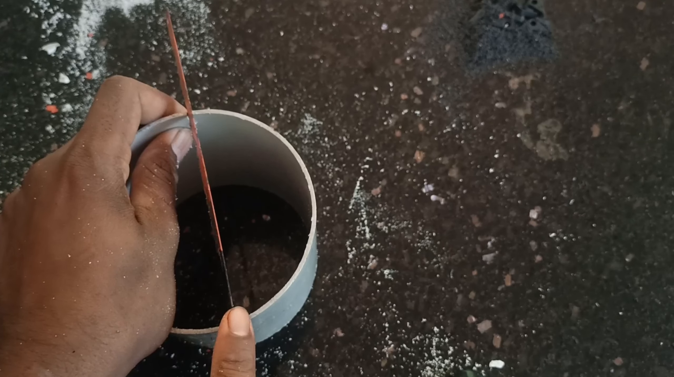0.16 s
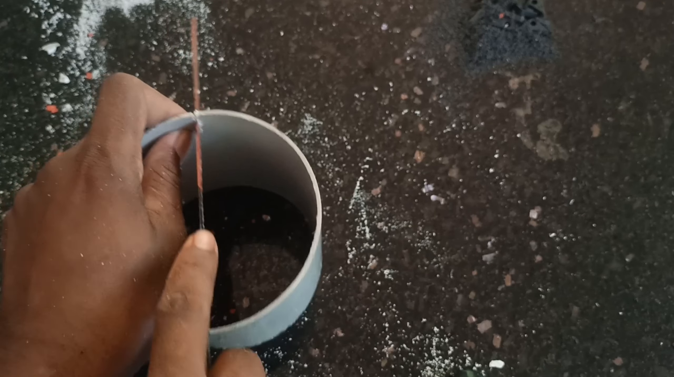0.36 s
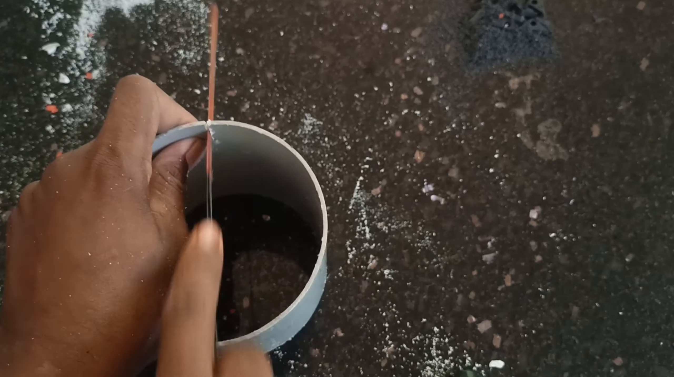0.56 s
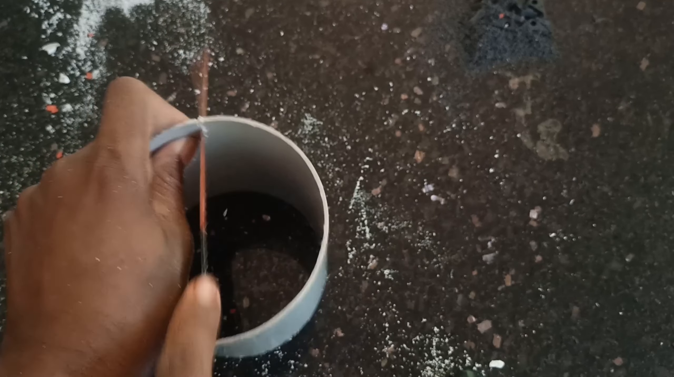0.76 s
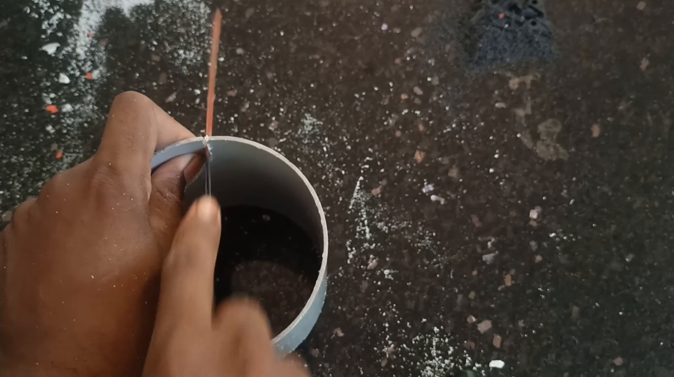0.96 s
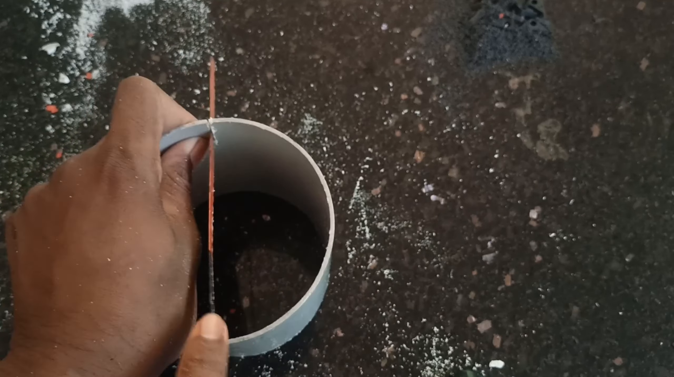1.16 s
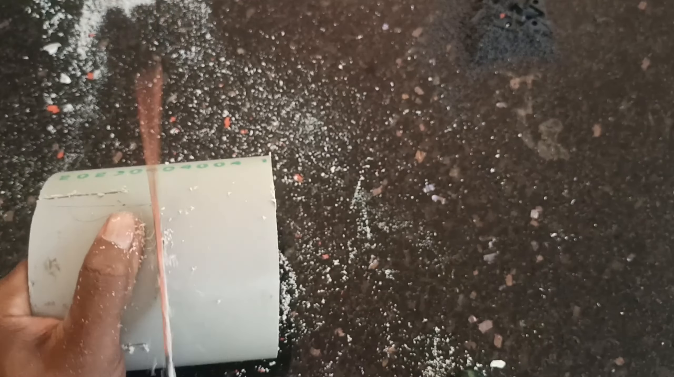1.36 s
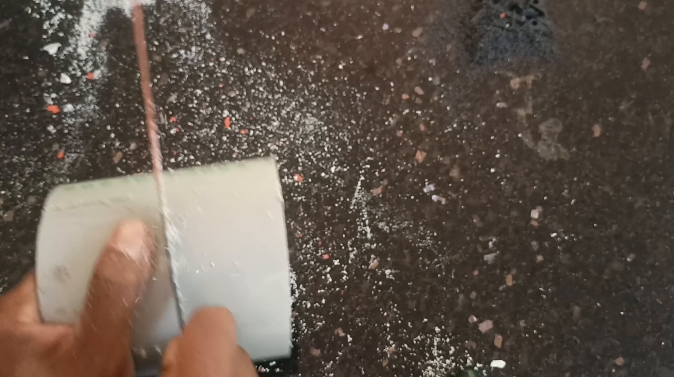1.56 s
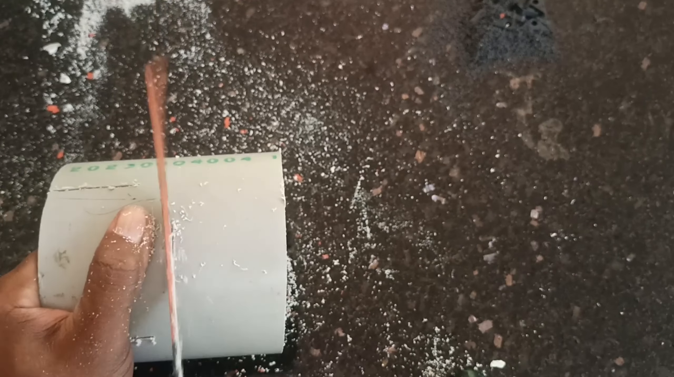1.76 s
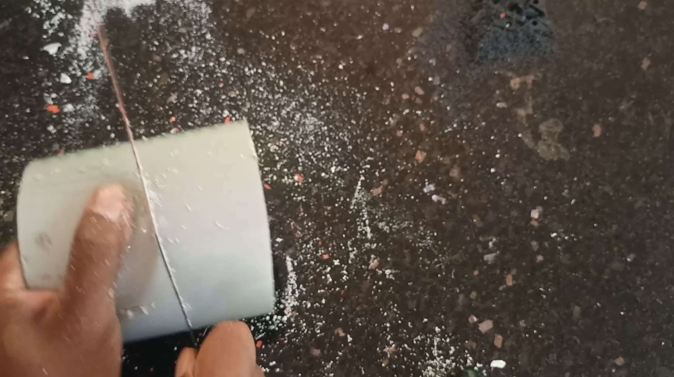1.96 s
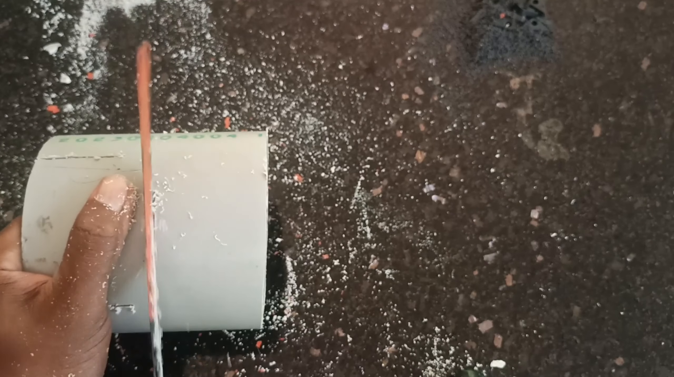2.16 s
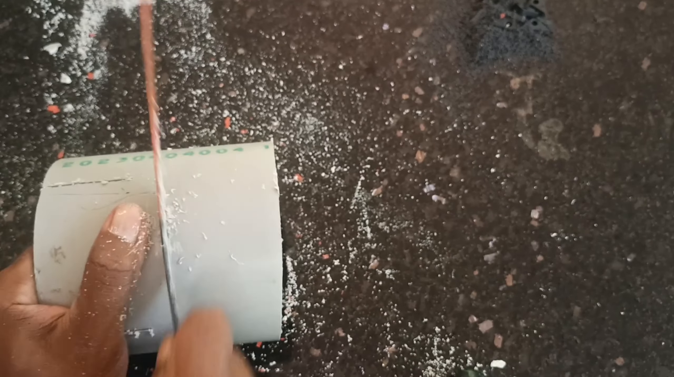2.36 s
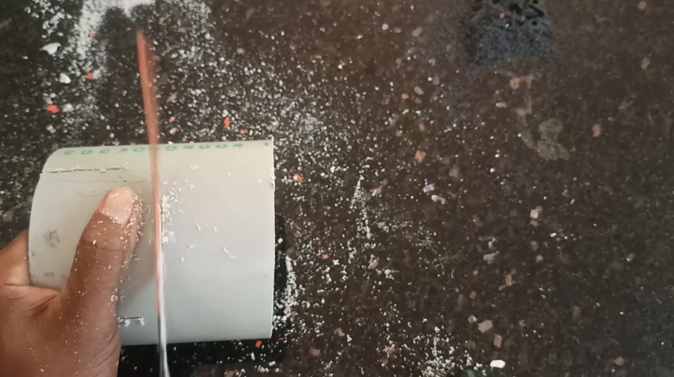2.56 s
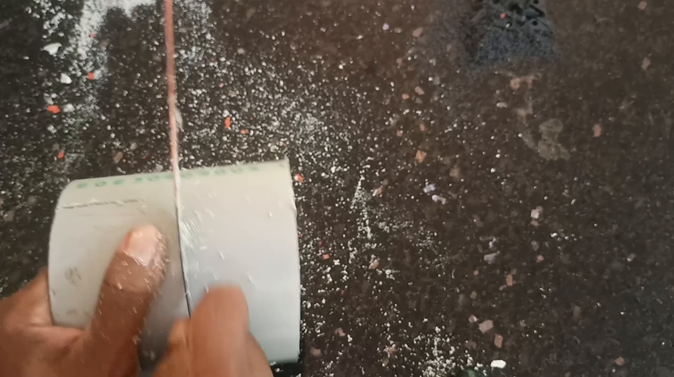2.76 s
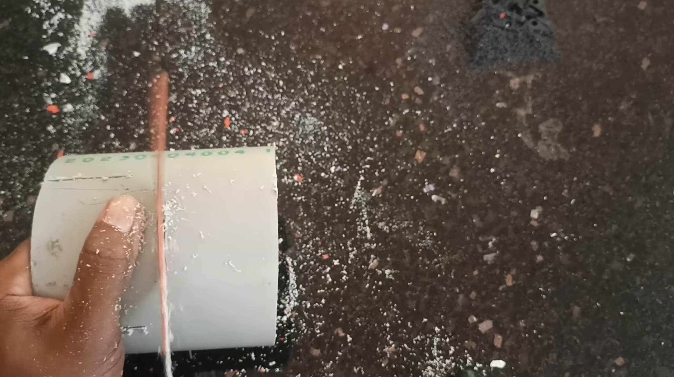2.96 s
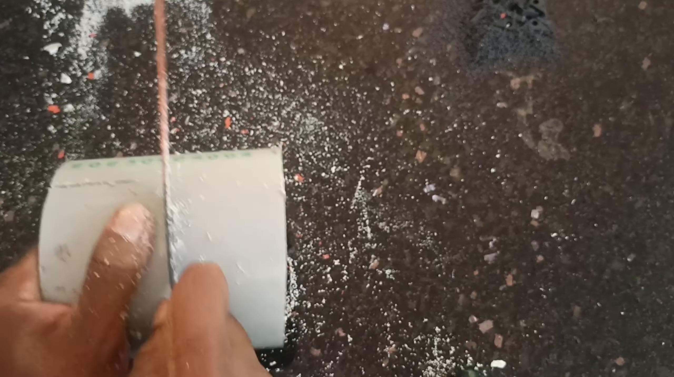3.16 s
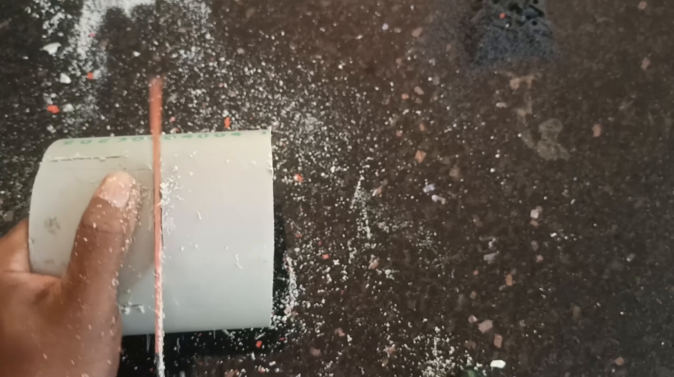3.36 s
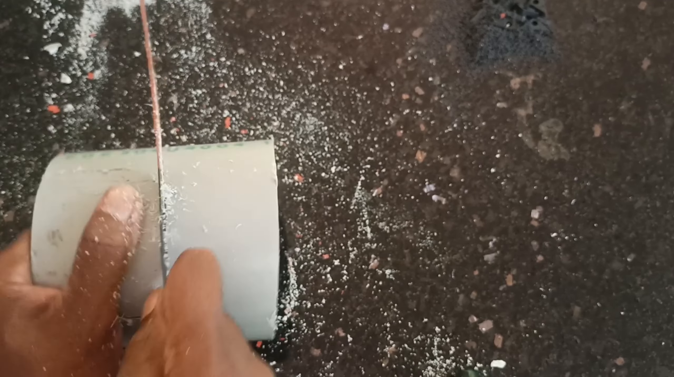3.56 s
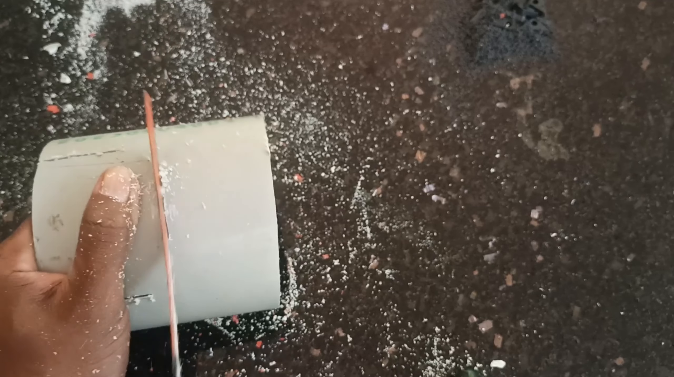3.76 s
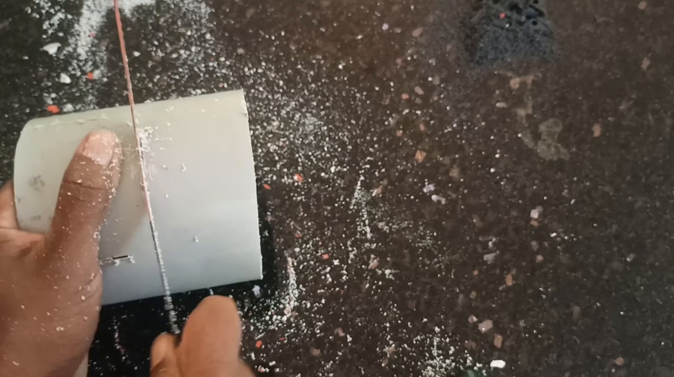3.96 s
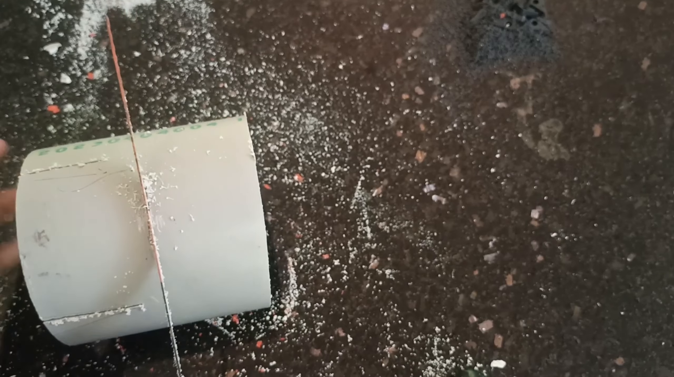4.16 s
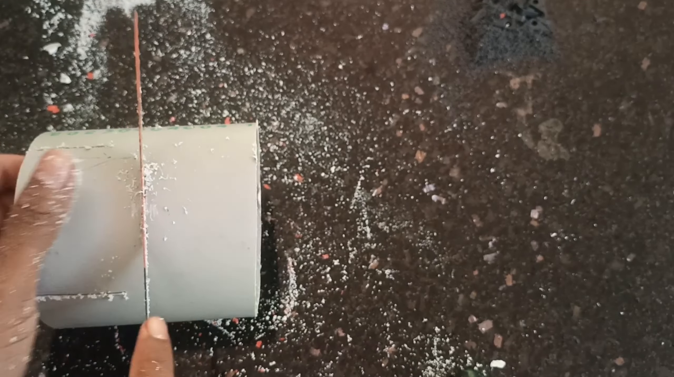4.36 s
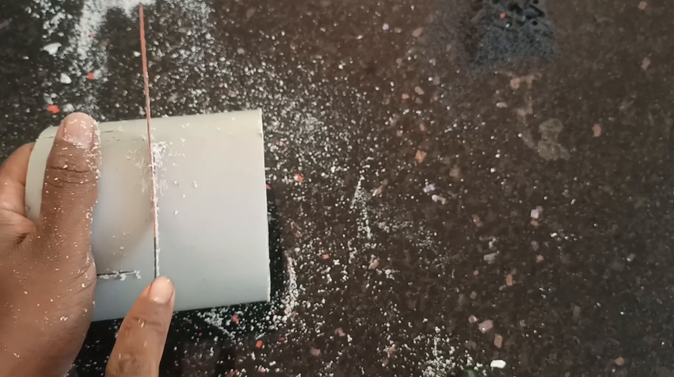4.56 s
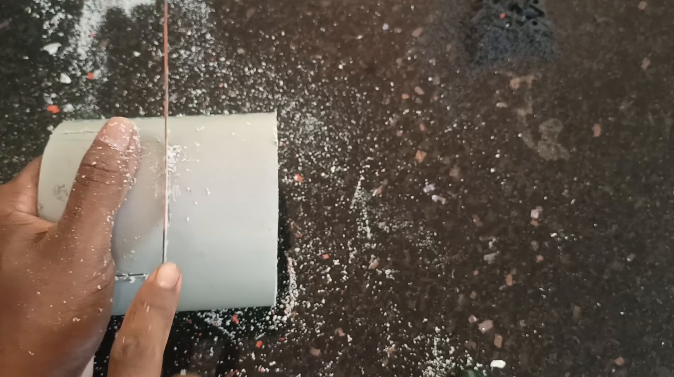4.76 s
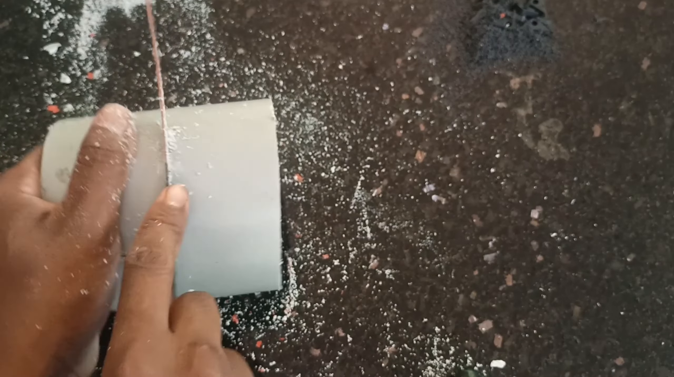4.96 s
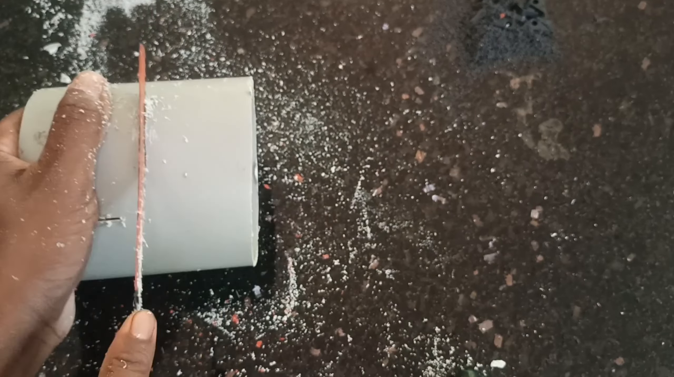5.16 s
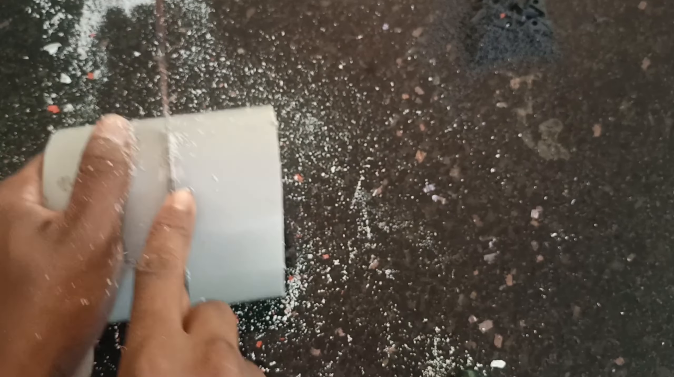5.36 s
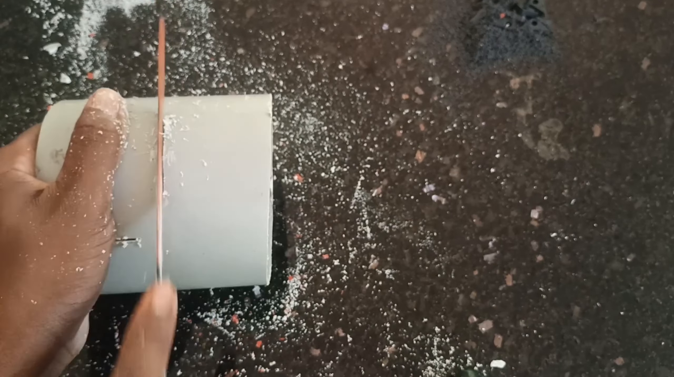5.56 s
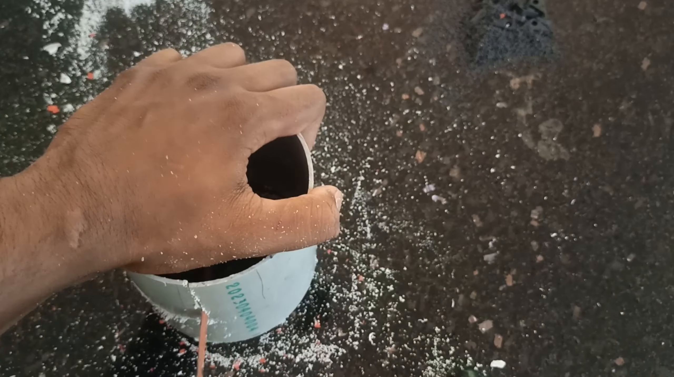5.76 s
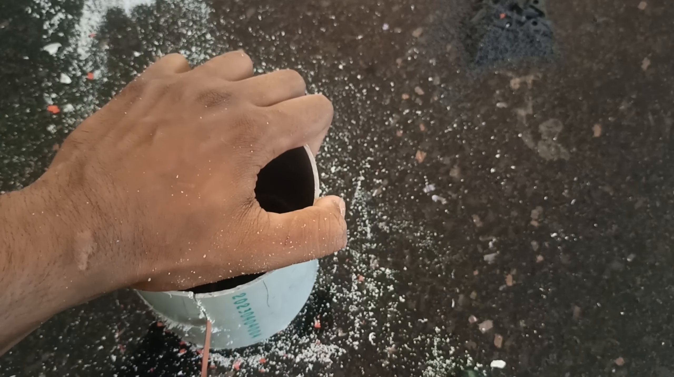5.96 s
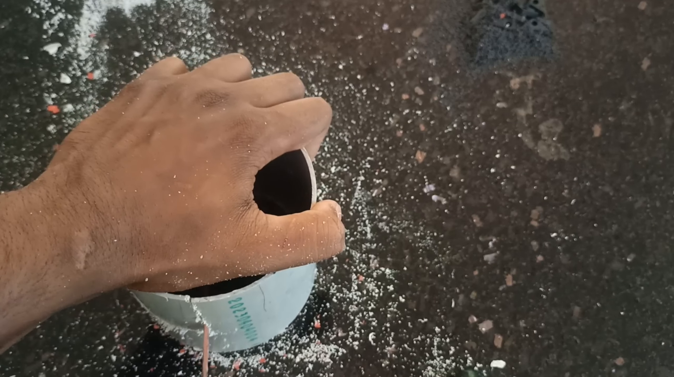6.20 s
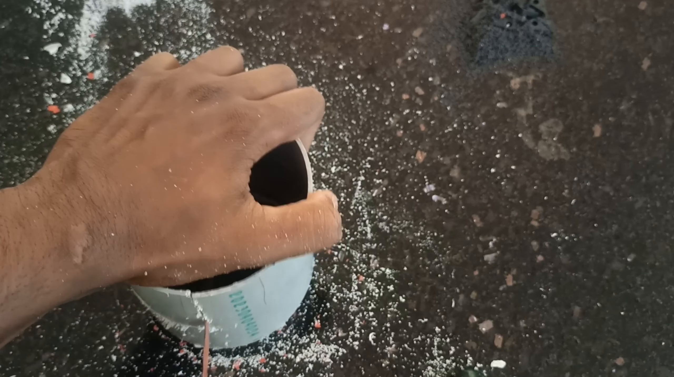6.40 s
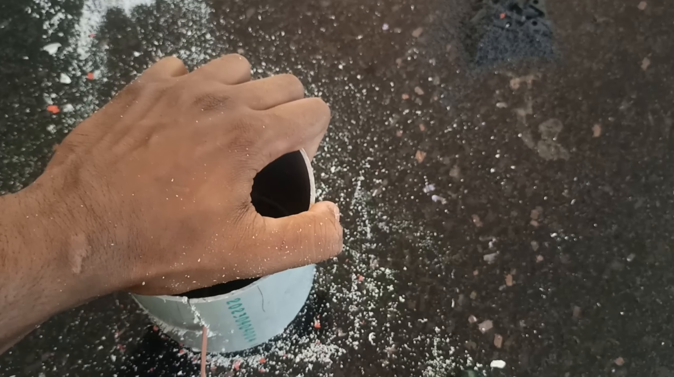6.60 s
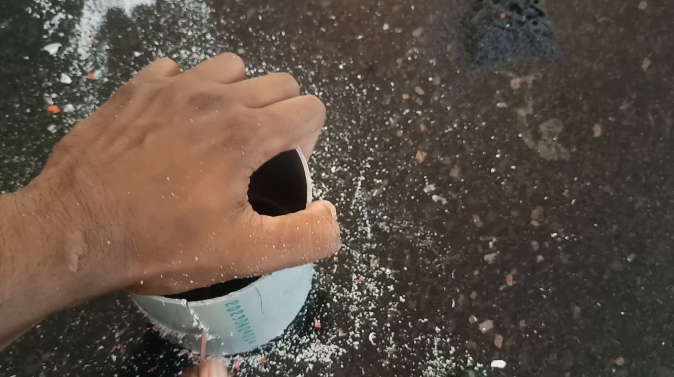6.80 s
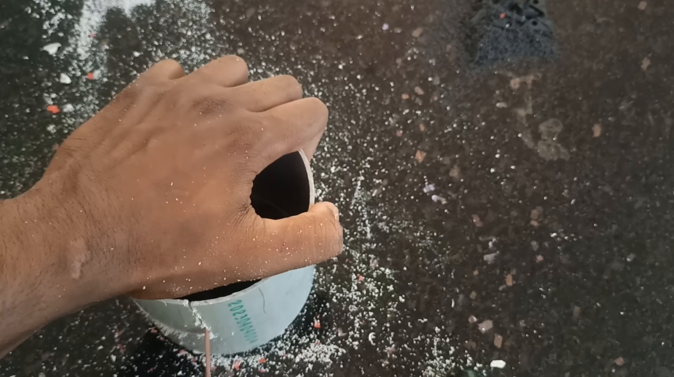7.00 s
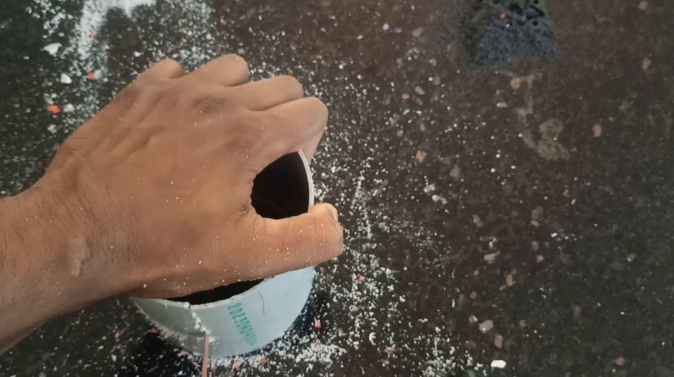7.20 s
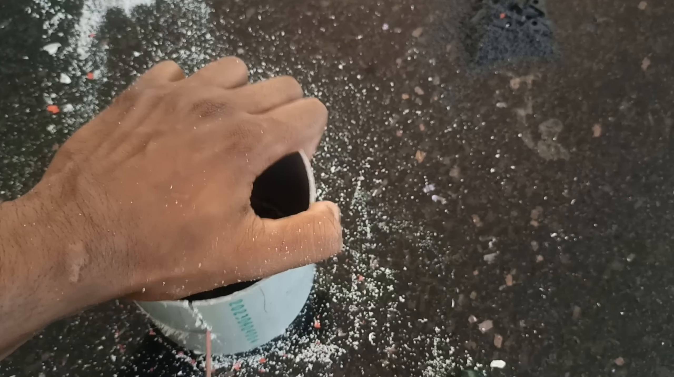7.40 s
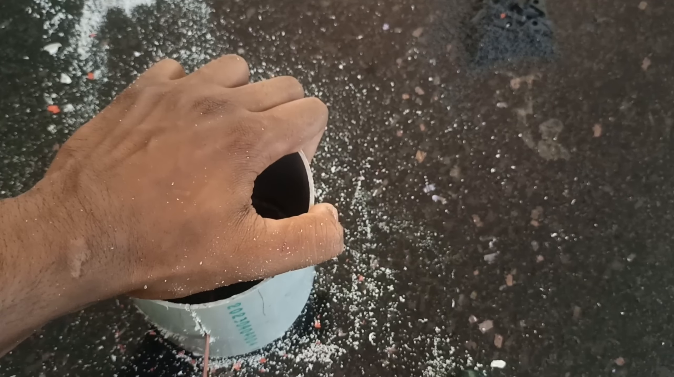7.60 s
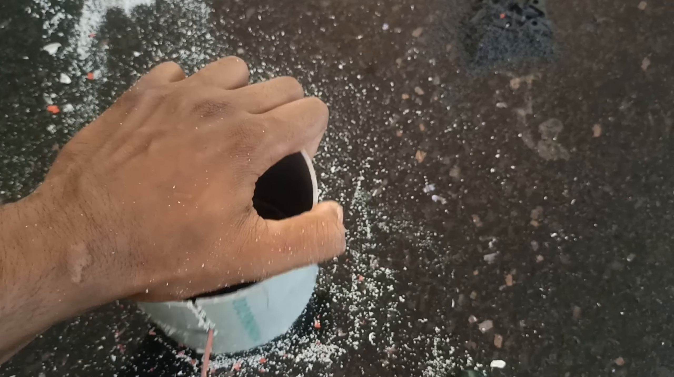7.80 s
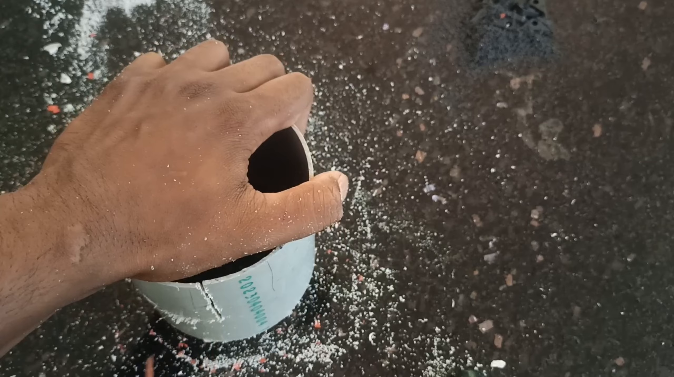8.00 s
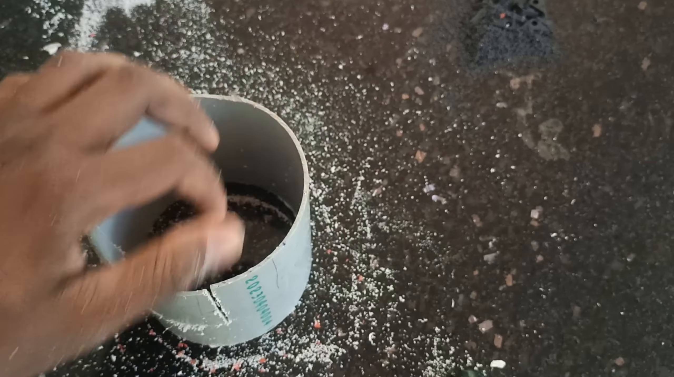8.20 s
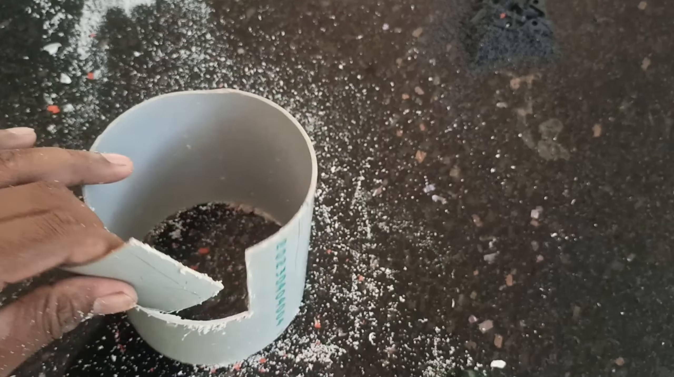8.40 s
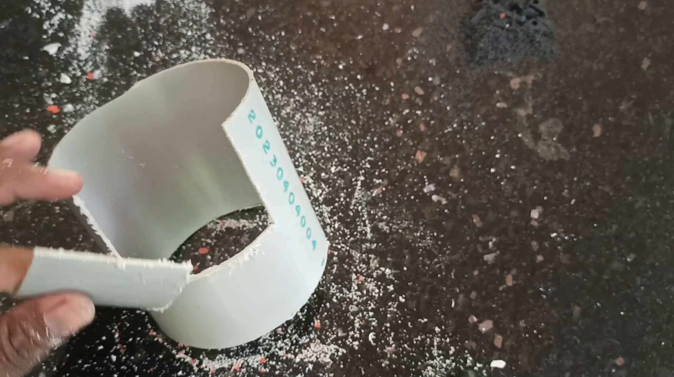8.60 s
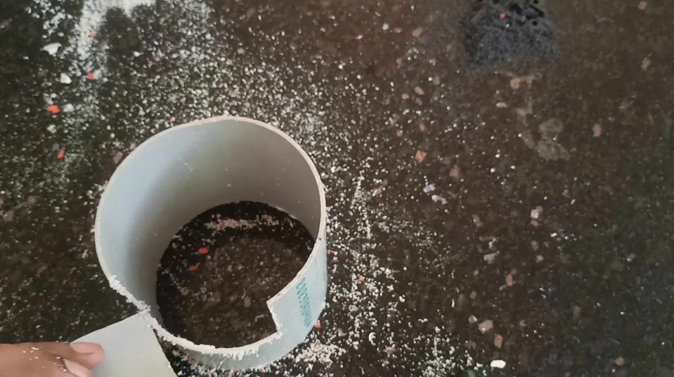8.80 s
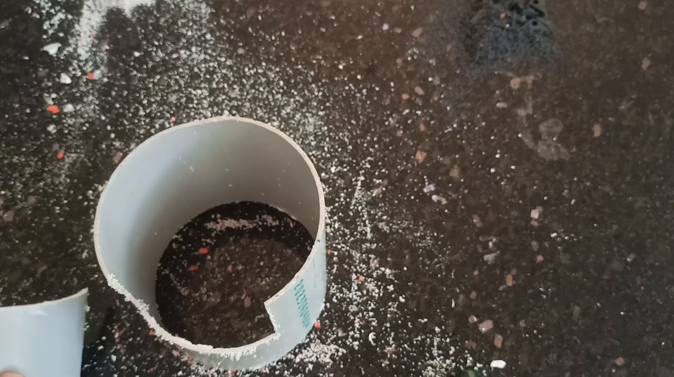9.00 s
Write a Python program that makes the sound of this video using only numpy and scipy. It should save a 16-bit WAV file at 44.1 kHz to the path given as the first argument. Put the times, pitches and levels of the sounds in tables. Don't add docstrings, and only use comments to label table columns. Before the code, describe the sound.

Outdoors on hard ground, very close and dry: rapid alternating push and pull strokes of a toothed blade in plastic, about seven or eight back-and-forths a second. The tone jumps abruptly from hollow to crisp and scratchy, then to a honking, rattling pipe body. Irregular cracks stand out where teeth catch. Near the end come a dull bump, quiet handling clicks, one snap and a little gritty scraping, with faint echoing bird trills behind.

```python
import sys
import numpy as np
from scipy import signal
from scipy.fft import rfft, irfft, next_fast_len
from scipy.io import wavfile
from scipy.ndimage import uniform_filter1d, map_coordinates

SR = 44100
rng = np.random.default_rng(int(sys.argv[2]) if len(sys.argv) > 2 else 0)


def int16_out(signal):
    q = np.round(np.clip(np.atleast_2d(signal).T, -1, 1) * 32767)
    wavfile.write(sys.argv[1], SR, q.astype(np.int16))


def makeup_ratio(level_db):
    decades = np.asarray(level_db, float) / 20
    return 10 ** decades


N = 398663


def noise():
    return rng.standard_normal(N)


def curve(table, column=1):
    rows = np.transpose(table)
    return np.interp(np.arange(N) / SR, rows[0], rows[column])


def walk(rate):
    k = int(SR / rate)
    steps = np.repeat(rng.standard_normal(N // k + 1), k)
    return 1.29 * uniform_filter1d(uniform_filter1d(steps, k), k)[:N]


def gain_db(hz, colour, modes=()):
    f, db = np.transpose(colour)
    lift = sum(up / (1 + (2 * (hz - centre) / width) ** 2) for centre, width, up in modes)
    return np.interp(np.log(hz + 1), np.log(f), db, left=db[0] - 22, right=db[-1] - 49.5) + lift


def ring(x, colour, modes):
    size = 8192
    cepstrum = irfft(gain_db(np.fft.rfftfreq(size, 1 / SR), colour, modes) * np.log(10) / 20)
    cepstrum[1:size // 2] *= 2
    cepstrum[size // 2 + 1:] = 0
    h = irfft(np.exp(rfft(cepstrum)))[:size // 2]
    return signal.fftconvolve(x, h / np.sqrt(np.sum(h ** 2)))


def fade(x, s):
    return signal.lfilter([1], [1, -np.exp(-1 / (s * SR))], x)


def spikes(s, db):
    out = np.zeros(N)
    np.add.at(out, (np.asarray(s) * SR).astype(int), makeup_ratio(np.asarray(db)))
    return out


def band(x, lo_hz, hi_hz):
    return signal.sosfilt(signal.butter(2, [lo_hz, hi_hz], "band", fs=SR, output="sos"), x)


def echoes(x, t60):
    t = np.arange(SR // 2) / SR
    h = rng.standard_normal(len(t)) * np.exp(-np.log(1000) * t / t60) * (t > .003)
    return signal.fftconvolve(x, h / np.sqrt(np.sum(h ** 2)))[:N]


# push bites in seconds, pull starts in seconds,
# push rasp in dB, pull rasp in dB, first bite of the push in dB.
UPRIGHT = [(.325, .422, -39, -28, -46), (.4912, .571, -21.5, -20.5, -36), (.638, .715, -22.5, -21, -33),
           (.78, .862, -21.5, -21, -37), (.918, .989, -20, -21.5, -23)]
LYING = [(1.278, 1.286, -36.5, -29.5, -25), (1.354, 1.418, -28.5, -28.5, -7.5),
         (1.504, 1.542, -30, -26.5, -6), (1.627, 1.675, -28.5, -27, -9.5), (1.757, 1.816, -26, -29.5, -14),
         (1.889, 1.933, -29, -27.5, -7), (2.011, 2.081, -29.5, -27.5, -11.5), (2.153, 2.214, -32, -30, -32),
         (2.296, 2.348, -27.5, -28, -5.5), (2.424, 2.484, -24.5, -29.5, -18), (2.571, 2.618, -26, -27, -14),
         (2.695, 2.755, -25.5, -27, -8), (2.811, 2.884, -24, -25.5, -11), (2.953, 3.005, -25.5, -27.5, -9),
         (3.088, 3.14, -27, -23.5, -30), (3.213, 3.271, -25, -26.5, -17), (3.35, 3.4, -28.5, -24, -12.5),
         (3.47, 3.534, -23.5, -22.5, -20), (3.607, 3.661, -22.5, -25.5, -19),
         (3.726, 3.786, -24, -26.5, -24), (3.856, 3.922, -30, -32, -9.5)]
TURNED = [(4.74, 4.778, -58, -40, -60), (4.868, 4.931, -31.5, -30.5, -47), (5.009, 5.058, -29, -36.5, -31),
          (5.151, 5.206, -31.5, -27.5, -26), (5.289, 5.367, -27, -30, -34),
          (5.422, 5.483, -28.5, -24.5, -32), (5.5584, 5.612, -29, -28, -14)]
SQUEEZED = [(5.667, 5.749, -39, -36.5, -38), (5.824, 5.89, -30, -31.5, -40),
            (5.9748, 6.03, -28, -28, -19.5), (6.101, 6.162, -27, -27.5, -19.5),
            (6.2496, 6.307, -26, -30, -8), (6.361, 6.418, -31, -37, -39), (6.507, 6.553, -26, -32, -12),
            (6.634, 6.695, -28.5, -29, -29), (6.768, 6.824, -27, -27.5, -10),
            (6.8952, 6.953, -24, -30.5, -17.5), (7.023, 7.08, -24.5, -31.5, -24.5),
            (7.154, 7.202, -23.5, -28, -18), (7.277, 7.337, -24, -29.5, -31),
            (7.4283, 7.47, -23, -37.5, -4), (7.554, 7.617, -24.5, -24.5, -18),
            (7.685, 7.74, -25, -27, -15.5), (7.905, 7.969, -39, -53, -36)]
GRIP_STARTS_S = [0, 1.271, 5.655, 8.2, 10]
# turn-round in seconds, dip before a push in dB, dip before a pull in dB,
# wall on a push in dB, wall jolt of the first bite in dB.
GRIPS = [
    (0.029, -18, -12, -1, 1.5),
    (0.03, -17.5, -12.5, -1.5, -0.5),
    (0.025, -22, -13.5, -5.5, 6),
]
# time in seconds, wall above rasp in dB.
COUPLING = [(.3, -1.5), (1.1, 0), (1.27, -6), (2.9, -7.5), (3.9, -2.5), (4.8, -2.5), (5.35, -6), (5.62, 4),
            (5.66, 17.5), (5.95, 16), (7.0, 15), (7.9, 13.5)]


def strokes():
    lead_s, shortest_s, longest_s, last_s = 0.0041, .01, 0.043, 0.037
    rows, first = [], []
    for bout in (UPRIGHT, LYING, TURNED, SQUEEZED):
        for k, (push_s, pull_s, push_db, pull_db, bite_db) in enumerate(bout):
            turn_s, push_dip, pull_dip, push_wall, jolt = GRIPS[np.searchsorted(GRIP_STARTS_S, push_s) - 1]
            wall = np.interp(push_s, *np.transpose(COUPLING))
            push_wall_db = push_db + wall + push_wall
            start = push_s - lead_s
            push_len = np.clip(pull_s - start - turn_s, shortest_s, longest_s)
            pull_len = last_s
            if k + 1 < len(bout):
                pull_len = bout[k + 1][0] - lead_s - pull_s - turn_s
            pull_len = np.clip(pull_len, shortest_s, longest_s)
            rows.append((start, push_len, push_db, push_wall_db, push_dip, 0.62, 0.74))
            rows.append((pull_s, pull_len, pull_db, pull_db + wall, pull_dip, 0.37, 0.6))
            first.append((push_s, bite_db, push_wall_db + jolt))
    return rows, first


def per_stroke(pairs):
    starts = np.array([row[0] for row in strokes()[0]])
    index = np.searchsorted(starts - .006, np.arange(N) / SR).clip(1) - 1
    return uniform_filter1d(np.ravel(pairs)[index] * 1., size=300)


def pressure(column, dip_share):
    edge_db, ramp_s, landing_s = -5, 0.054, 0.0049
    rows = strokes()[0]
    points = [(0, -90), (rows[0][0] - .01, -70)]
    far_off = (14, 0, -102, -112, -40)
    for now, after in zip(rows, rows[1:] + [far_off]):
        start, length, top = now[0], now[1], now[column]
        end = start + length
        half = min((after[0] - end) / 2, ramp_s)
        rest = half == ramp_s
        points.append((start, top + edge_db))
        points += [(start + now[5] * length, top), (start + now[6] * length, top)]
        points.append((end, top + edge_db))
        if rest:
            points.append((end + half, top - 30))
            points.append((after[0] - landing_s, after[column] - 30))
        else:
            points.append((end + 1.3 * half, min(top, after[column]) + dip_share * after[4]))
    return makeup_ratio(curve(points))


def bites():
    rate, spread_db = 1500, 2.5
    return (rng.random(N) < rate / SR) * makeup_ratio(spread_db * rng.exponential(1, N).clip(0, 4))


# time in seconds, tilt towards the bass in dB per octave.
SEAT = [(1.2, 5), (1.3, 0.), (4.0, 1.5), (4.8, 2.5), (5.6, 2.5), (5.7, 1.5)]
# tilt to the bass on the push and on the pull
# in dB per octave, wall on the push and on the pull in dB.
LEAN = [(-0.5, -1, -0.5, 1.0), (0, -1.5, -0.5, -1.0), (-2.0, -2.0, -0.5, -1.0), (-1.5, -0.0, 0.5, -0.5),
        (-1.5, -2.5, -1.0, 1.5), (-0.5, -0.5, -0.5, -1), (0.5, 0, 0, -1), (1.5, 1, 0, 0.0),
        (-2, -2, -0.5, -1), (-0.5, 0, -2, 2.5), (1.5, 0.5, -1.5, -0.5), (1.0, 1.5, 3, -1),
        (0.5, -3, 2.5, 1.5), (-1.5, -1.5, 0.5, -0.5), (-0.5, -0.5, 1, 2.0), (1, -0.5, 1.0, 0.5),
        (2.0, -0.5, 0, 0.0), (-0.5, 1, 1.5, -1.5), (0, -1, 1.0, 1.5), (1, 0.5, 0, -1.5),
        (0.5, -3, -0.5, -0.5), (1.0, -1.5, 0.5, 1), (-1.5, -0.5, -1.5, 1), (-2, -0.0, 0, 1.0),
        (-2.5, -1.5, 1.5, 2), (1.5, 0.5, 1.5, 0.5), (-0.5, 0.5, -1.5, 1.5), (0, -1.5, 0, 0),
        (1.5, -1.5, -1.5, 2), (1, -2.0, 2.0, 0), (-0.5, -0.5, 0.5, 0), (-2.0, 0.5, -1.0, -0.5),
        (-1.5, 1.5, -1.5, 0.5), (-1, 0, 3, 1), (0.5, 1.0, -0.5, -1.5), (-1.5, -1.5, -1.0, 1.0),
        (-0.5, -0.0, -1.0, 1.0), (0.5, -1, -0.0, 1.0), (0.5, -0.0, -1.5, -2), (-1.5, -0.5, 0.5, 0.5),
        (-2, -1.0, -1.0, 1), (-2.5, 0.5, -1.5, 2.5), (-1.0, 0, -0.5, 1), (-2.5, 1.0, 0, 0),
        (-1.0, -0.5, -1.0, 3), (-2.5, 0, 1.5, -1), (-1.5, -0.5, 0.5, 0), (-2.0, -0.5, -0.5, -1.0),
        (-0.5, 0, 0, 0.0), (0.5, 0.5, -1.5, -0.0)]


def chips(shared, force, cracks):
    bite_s, own_bites, patchy_db, snag_dull_db, stroke_colour_db = 0.00091, 1.04, 2, -5, 0.7
    out = 0
    edges = np.geomspace(700, 17000, num=12)
    tilt = curve(SEAT) + per_stroke(np.array(LEAN)[:, :2])
    for lo_hz, hi_hz in zip(edges[:-1], edges[1:]):
        puffs = fade(shared + own_bites * bites(), bite_s) + .5
        puffs = puffs / np.sqrt(np.mean(puffs ** 2))
        dull = makeup_ratio(snag_dull_db * abs(np.log2(lo_hz / 4500)))
        seat_db = tilt * np.clip(np.log2(5000 / lo_hz), -1, 1.2) + stroke_colour_db * walk(14)
        swell = makeup_ratio(patchy_db * walk(30) + 1.97 * walk(130))
        loudness = puffs * force * swell + dull * cracks * swell ** .4
        out = out + band(noise(), lo_hz, hi_hz) * loudness * makeup_ratio(seat_db)
    return out


# time in seconds,
# crack peak in dB, wall in dB.
KNOCKS = [(0.046, -35, -53), (1.1459, -23.5, -38.5), (7.8109, -39, -27), (7.902, -25, -19),
          (8.114, -48, -55), (8.108, -51, -40.5), (7.848, -48, -29), (7.83, -50, -32), (7.894, -34, -25),
          (7.937, -30, -27.5), (8.429, -53, -72), (8.748, -18, -43)]
# time in seconds, crack peak in dB, wall in dB.
SNAGS = [(0.3603, -17.5, -28.5), (0.428, -37.5, -26.5), (.577, -11, -20), (0.6582, -23, -15),
         (0.6488, -20, -21.5), (1.002, -14, -19.5), (.815, -6, -15), (0.8675, -15, -29),
         (.524, -16, -19), (0.944, -17, -22), (1.307, -15, -48), (1.3694, -6.5, -50),
         (1.9052, -13, -33.5), (2.249, -12.5, -45), (2.435, -11.5, -29), (2.8378, -31, -33),
         (2.891, -14, -41), (3.042, -13, -40), (3.1773, -12, -36), (3.2263, -5, -28),
         (3.2945, -10, -30.5), (3.3653, -8.5, -42), (3.4248, -18, -41), (3.6263, -11.5, -30),
         (3.74, -15, -23.5), (3.8099, -11.5, -26), (3.875, -15, -24.5), (5.0243, -16, -47),
         (5.233, -18, -46), (5.364, -15.5, -29.5),
         (5.7678, -30, -13), (5.787, -26, -21), (5.9145, -15, -12), (6.0003, -11.5, -11),
                  (6.046, -29, -11.5), (6.13, -17.5, -15), (6.1889, -17, -3), (6.3137, -40, -11.5),
                  (6.3822, -13, -7), (6.5211, -15, -20), (6.5736, -22, -11.5), (6.708, -29, -6),
                  (6.7885, -12, -10), (6.914, -10.5, -11.5), (6.957, -15.5, -29), (6.9752, -23, -7),
                  (7.0309, -30, -13.5), (7.042, -9.5, -11.5), (7.0854, -29, -12), (7.1753, -7, -14),
                  (7.2995, -5.5, -10.5), (7.3596, -16, -6), (7.4084, -22, -8), (7.45, -13, -17.5),
                  (7.486, -23, -10), (7.4973, -13.5, -11), (7.5796, -8, -13), (7.698, -12, -13.5),
                  (7.682, -19, -7), (7.9177, -11.5, -9),
         (0.729, -13, -21.5), (.541, -14, -24), (2.315, -13, -27), (2.846, -19, -36),
               (3.108, -23, -25.5), (3.165, -15, -42), (3.272, -30, -25), (3.49, -14, -36),
               (4.885, -36, -31), (4.939, -30, -33), (4.96, -29, -39), (5.077, -33, -30.5),
               (5.15, -34, -40), (5.22, -30, -32), (5.346, -25, -30), (5.495, -30, -30), (5.577, -26, -27),
               (5.616, -35, -21.5), (5.756, -36, -20), (6.062, -33, -13), (6.267, -13.5, -13.5),
               (6.358, -30, -10.5), (6.437, -39, -18.5), (6.446, -32, -17), (6.489, -35, -18.5),
               (6.634, -32, -18), (6.851, -26, -9.5), (7.15, -28, -11), (7.23, -28.5, -11.5),
               (7.568, -18, -11), (7.641, -23, -16), (7.71, -20, -10), (7.768, -17, -13), (7.783, -25, -12),
               (1.048, -31, -24)]
# on the push in dB, on the pull in dB.
DEEP = [(4, 4.0), (1, 1), (-1.5, 2), (-3.0, 2), (0, 1.5), (2.5, -1), (-2, 1), (-5, 0), (-1, 0), (0, 6),
        (-6.0, 2), (3.5, 1), (2.5, -0.0), (-1, 6.0), (5.0, 2), (0.5, 2), (-0.0, 1.5), (-2.5, 1), (2.5, 0),
        (-7.0, 0), (-3, -3), (4.5, 1), (-4, 1), (-4.5, -1), (2, 2), (1, 4), (-3.5, 8), (3, 0), (8, 5),
        (0, 2), (0.5, 6.5), (-4, -0.0), (-6, -4), (-4, -4.0), (4, -4.5), (6.5, 6), (5.0, 6.0), (-0.0, -0.5),
        (-4.5, 2.5), (2.5, 0.0), (6.5, -2), (2.5, 3), (5, -1), (3, 1.5), (2.0, -0.5), (-1.5, -3),
        (-2.5, 0.5), (-2.5, -3), (-3, -5), (-2, -4)]
# pitch in Hz, level in dB per Hz.
RASP = [
    [(710, -42), (1200, -16.5), (2000, -11), (2430, -19), (3180, -5), (3470, -6), (4220, -1.5),
     (7660, -9.5), (10700, -18.5), (14800, -8.5), (16000, 0)],
    [(710, -24), (1200, -29), (2110, -14), (3590, -5.5), (4130, -2), (5070, -1.5), (6580, -5), (7910, -6),
     (10700, -13), (15000, -1), (16000, -2)],
    [(710, -26.5), (1200, -16), (1610, -9), (1770, -1.5), (2380, -15.5), (5130, -5.5), (5710, -12),
     (7250, -10.5), (9930, -19.5), (14700, -15), (16000, -7.5)],
    [(500, -8), (1200, -1), (5300, 5), (9200, -19), (16000, -28)],
]
WALL = [
    [(24, -61), (40, -33.5), (266, -2), (366, -8), (568, 1), (758, -4), (996, -8), (1500, -25), (1950, -69),
     (3300, -120)],
    [(24, -28), (40, -20.5), (243, -8), (355, -9.5), (503, -1.5), (800, -2), (1190, -11), (1500, -13.5),
     (1950, -26.5), (3300, -120)],
    [(24, -61), (40, -38), (290, -13.5), (345, -10.5), (400, -2), (600, 1), (730, -9), (850, -17),
     (1500, -31), (2000, -64)],
    [(59, -29), (100, -2), (529, 3), (998, 0.5), (1500, -8), (1950, -29), (3300, -120)],
]
# pitch in Hz, width in Hz, lift in dB.
RASP_MODES = [
    [(3200, 100, 0), (4170, 350, 3.5), (5150, 200, 0)],
    [(4170, 220, 2.5), (5250, 360, 5), (7790, 1260, 4.5)],
    [(1765, 75, 7), (2108, 24, 5), (2660, 122, 8.5), (3360, 210, 7), (4006, 170, 5.5), (5224, 200, 9.5),
     (7300, 200, 1)],
    [(2170, 210, 13)],
]
WALL_MODES = [
    [(635, 260, 2.9)],
    [(512.4, 42, 8.3), (662, 53, 5.8), (1000, 100, 6.6)],
    [(424.6, 45, 5), (461.4, 22, -7.5), (520, 49, 4.5), (611, 93, 4), (681, 51, 7), (1001, 163, 13.5)],
    [],
]


def pipe():
    snag_s, snag_rise_s, snag_db, knock_fade_s = 0.0024, 0.0017, -3.5, 0.0018
    wall_dip, wall_patchy_db, bend_s = 0.54, 1.8, .0004
    shared = bites() * makeup_ratio(2.0 * walk(90))
    shoves = shared * np.sign(noise())
    snags = strokes()[1] + SNAGS
    s, crack_db, wall_db = np.transpose(snags)
    knock_s, knock_db, knock_wall_db = np.transpose(KNOCKS)
    force = spikes(s, crack_db + snag_db)
    cracks = fade(force, snag_s) + fade(force[::-1], snag_rise_s)[::-1]
    cracks = cracks + fade(spikes(knock_s, knock_db), knock_fade_s)
    rasp = chips(shared, pressure(2, 0.98), cracks)

    edges = [30, 200, 340, 470, 580, 720, 1000, 3000]
    wall = 0
    for lo_hz, hi_hz in zip(edges[:-1], edges[1:]):
        wall = wall + band(shoves, lo_hz, hi_hz) * makeup_ratio(wall_patchy_db * walk(30))
    wall = wall / shoves.std() * 1.34 * pressure(3, wall_dip)
    jolts = spikes(s - .002, wall_db) + spikes(knock_s, knock_wall_db + 4.0)
    judder = (fade(jolts, 0.006) + fade(jolts[::-1], 0.0025)[::-1]) * noise()
    wall += fade(.95 * jolts + 0.07 * judder, 0.00023)
    low = signal.sosfiltfilt(signal.butter(2, 500, fs=SR, output="sos"), wall)
    deep = makeup_ratio(per_stroke(DEEP) / 2)
    wall = (low * deep + (wall - low) / deep) * makeup_ratio(per_stroke(np.array(LEAN)[:, 2:]))

    out = np.zeros(N + SR)
    for k in range(len(RASP)):
        a, b = (min(int(edge_s * SR), N) for edge_s in GRIP_STARTS_S[k:k + 2])
        held = ring(rasp[a:b], RASP[k], RASP_MODES[k]) + ring(wall[a:b], WALL[k], WALL_MODES[k])
        out[a:a + len(held)] += held
    return map_coordinates(out, [np.arange(N) + bend_s * SR * walk(16)], order=3)


def rings(x):
    ring_db, share = 2, .025
    pitches_hz = np.geomspace(1900, 9000, num=12) * (1 + .04 * rng.standard_normal(12))
    out = 0
    for hz in pitches_hz:
        out = out + band(x, hz * (1 - share), hz * (1 + share)) * (walk(22) - .8).clip(0)
    return makeup_ratio(ring_db) * out


# pitch in Hz, level in dB per Hz.
AIR = [(15, -38), (25, -22), (43, -19.5), (145, 2.5), (394, -7.5), (1130, -16.5), (1480, -16.5),
       (2220, -20), (6210, -15.5), (8140, -15.5), (10400, -26.5), (14800, -18.5), (16000, -20)]
# time in seconds, level in dB, extra rumble in dB.
AIR_DB = [(0, -51, -0.5), (.3, -50.5, -0.5), (1.26, -50, 4), (1.3, -40.5, -5.5), (4.1, -47.5, -2),
          (5.6, -50, 3.5), (8.0, -46, 2), (8.15, -51, -3), (8.4, -54, -2.5), (8.7, -55.5, -2),
          (9.04, -52.5, -0.5)]


def air():
    flicker_db = 1.1
    size = next_fast_len(N)
    hz, out, swell = np.fft.rfftfreq(size, 1 / SR), 0, walk(1.59)
    spectrum = makeup_ratio(gain_db(hz, AIR)) * rfft(noise(), size)
    for centre in 30 * 2. ** np.arange(10):
        share = np.clip(1 - np.abs(np.log2((hz + 1) / centre)), 0, 1)
        rumble_db = curve(AIR_DB, column=2) * (centre < 1500)
        level_db = 0.86 * swell + flicker_db * walk(13) + rumble_db
        out = out + irfft(spectrum * share)[:N] * makeup_ratio(level_db)
    return out / out.std() * makeup_ratio(curve(AIR_DB))


# time in seconds, level in dB, pitch in Hz.
BUMPS = [(0.361, -40, 200), (3.93, -41, 200), (4.305, -54, 500), (1.205, -48, 400), (7.92, -31, 151),
         (8.28, -55, 400), (9.005, -53, 60)]


def bumps():
    cycles = 2.8
    out, t = np.zeros(N + SR), np.arange(SR // 4) / SR
    for s, db, hz in BUMPS:
        turns = t * hz
        swing = turns * np.exp(-turns * 3 / cycles) * np.sin(2 * np.pi * turns)
        out[int(s * SR):int(s * SR) + len(t)] += 3 * makeup_ratio(db) * swing
    return out[:N]


# from in seconds, to in seconds.
GAPS = [
    (1.2688, 1.2708),
    (5.6505, 5.659),
]


def silent_joins():
    t = np.arange(N) / SR
    return np.prod([np.clip(np.maximum(a - t, t - b) / .0008, .01, 1) for a, b in GAPS], axis=0)


# start in seconds, length in seconds, level in dB.
SPLITS = [(1.27, 0.041, -34.5), (2.798, .016, -25), (5.635, .02, -47), (6.237, .02, -41),
          (6.897, .026, -33), (7.165, 0.017, -26), (7.888, .02, -50), (8.108, .02, -61)]


def splits():
    t = np.arange(N) / SR
    shape = sum(makeup_ratio(db) * np.sin(np.pi * ((t - s) / length).clip(0, 1)) ** 2 for s, length, db in SPLITS)
    return 1.2 * shape * band(band(noise(), 4200, 14000), 4200, 15000)


# start in seconds, peak in dB.
CALLS = [(4.04, -47), (4.4694, -47), (4.615, -50), (4.745, -48), (7.8444, -48), (7.992, -43), (8.145, -44),
         (8.315, -46), (8.504, -49), (8.673, -47.5), (8.833, -40), (8.98, -45)]


def bird():
    top_hz, end_hz, t60_s, call_s, trill_rate = 6550, 4900, 0.24, .04, 80
    t, calls = np.arange(int(call_s * SR)) / SR, np.zeros(N + SR)
    for (s, db), chance in zip(CALLS, rng.random((len(CALLS), 2))):
        rate = trill_rate * (1.0 + .4 * chance[0])
        swing = .5 + .5 * np.cos(2 * np.pi * (rate * t - .12))
        sinking_top = top_hz * (1 - 1.5 * t - .04 * chance[1])
        phase = 2 * np.pi * np.cumsum(end_hz + (sinking_top - end_hz) * swing) / SR
        shape = (0.46 + 0.57 * swing) * np.minimum(t / 0.0031, 1) * np.exp(-t / 0.014)
        calls[int(s * SR):int(s * SR) + len(t)] += makeup_ratio(db) * shape * np.sin(phase)
    return makeup_ratio(3.5) * calls[:N] + echoes(calls[:N], t60_s) * makeup_ratio(5.5)


# time in seconds, grit in dB, hum in dB.
RUSTLE = [(8.75, -44, -37), (8.78, -55, -50), (8.81, -50, -54), (8.87, -49.5, -65), (8.92, -57.5, -67),
          (8.95, -65.5, -72.5), (8.99, -51, -68.5), (9.04, -64, -67)]
# pitch in Hz, level in dB per Hz.
GRIT = [(1500, -11), (4500, -2), (8000, 0), (10500, -18), (15000, -4.5)]


def rustle():
    crackle = fade((rng.random(N) < .02) * rng.exponential(1, N), .001)
    grains = (crackle + 2.0) * noise()
    grains *= (np.arange(N) / SR > RUSTLE[0][0]) / grains.std()
    grit = ring(grains * makeup_ratio(curve(RUSTLE)), GRIT, ())
    hum = ring(grains * makeup_ratio(curve(RUSTLE, column=2)), WALL[3], ())
    return (grit + hum)[:N]


def scene():
    room_db, room_t60_s = -16.5, 0.17
    near = pipe() + rustle() + bumps()
    room = echoes(0.73 * near + band(near, 990, 16000), room_t60_s)
    mono = near + makeup_ratio(room_db) * room + bird() + air()
    mono = mono + rings(near)
    return mono + splits() * np.array([[1], [-1]])


def low_pass(x):
    return signal.sosfilt(signal.butter(12, 16840, fs=SR, output="sos"), x)


def record(dry):
    rounded = np.tanh(0.76 * dry * silent_joins()) / 0.87
    top_edge = signal.ellip(8, .2, 50, 15700, fs=SR, output="sos")
    mix = signal.sosfilt(top_edge, rounded)
    return low_pass(mix)


dry = scene()
out = record(dry)
int16_out(out)
```